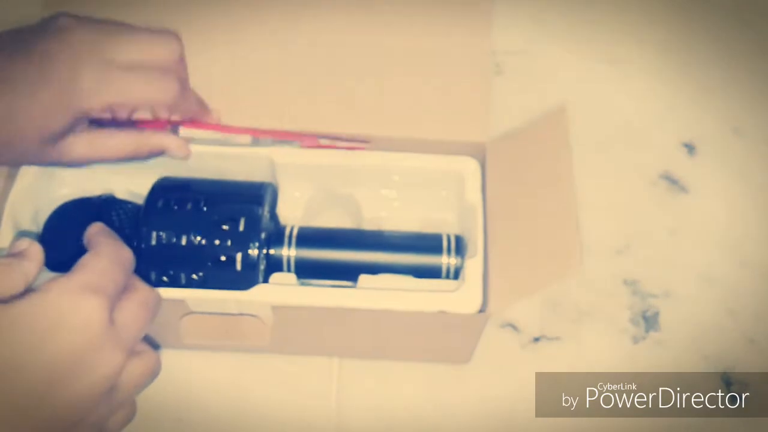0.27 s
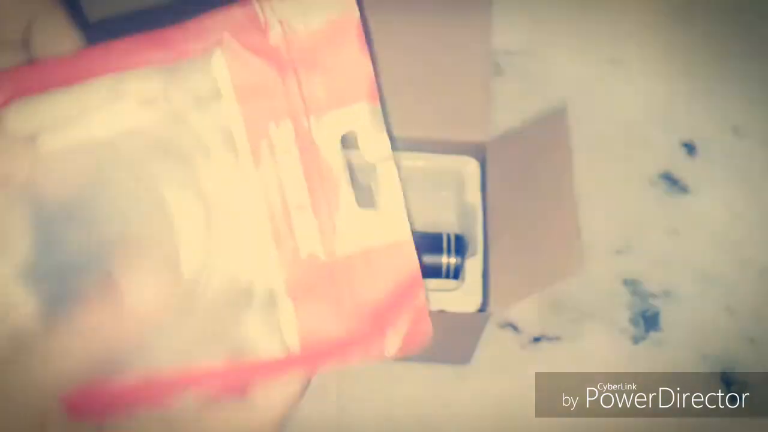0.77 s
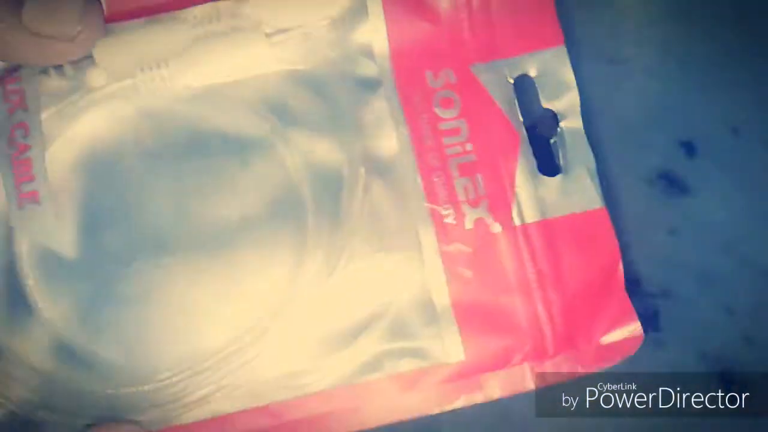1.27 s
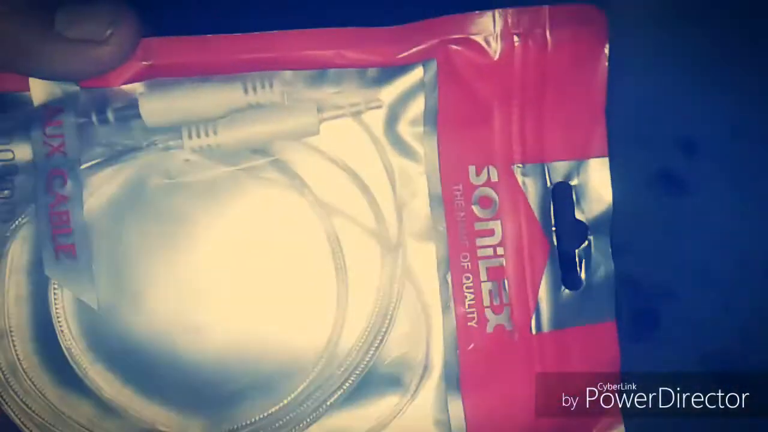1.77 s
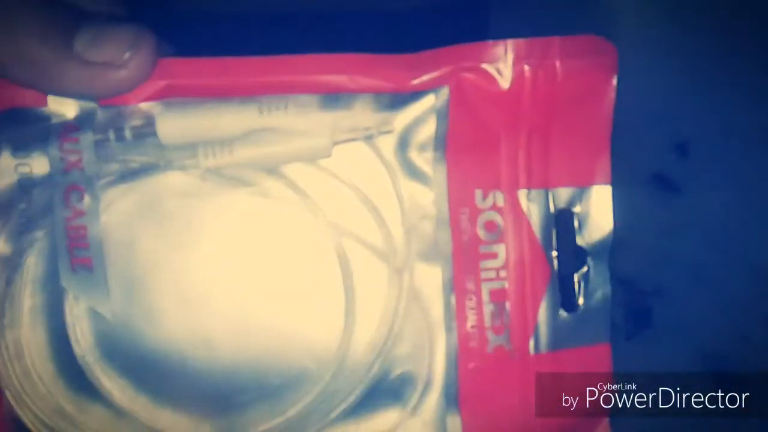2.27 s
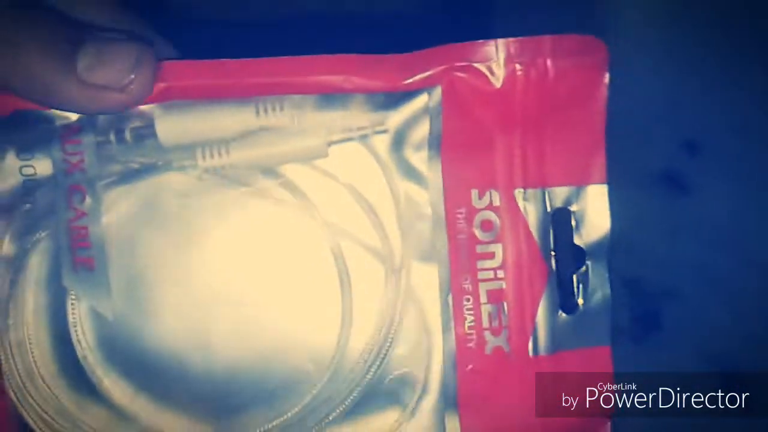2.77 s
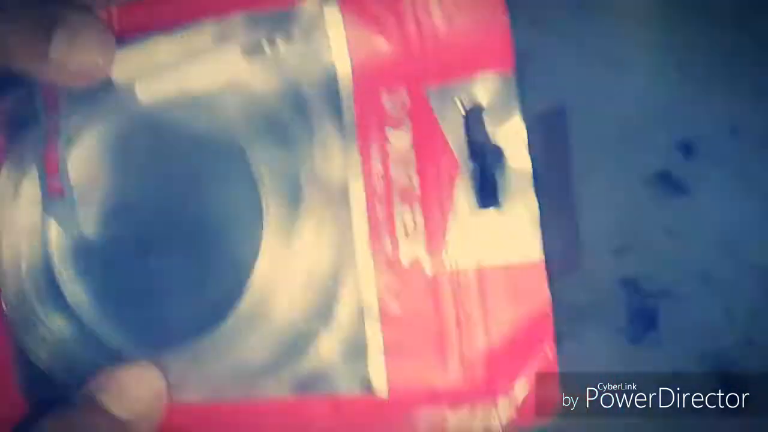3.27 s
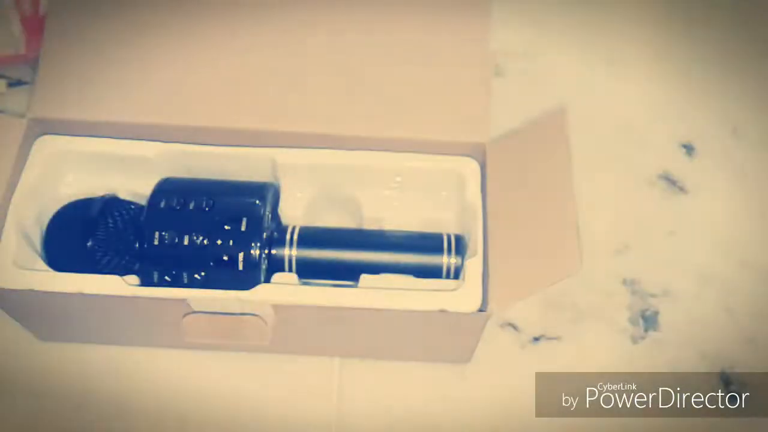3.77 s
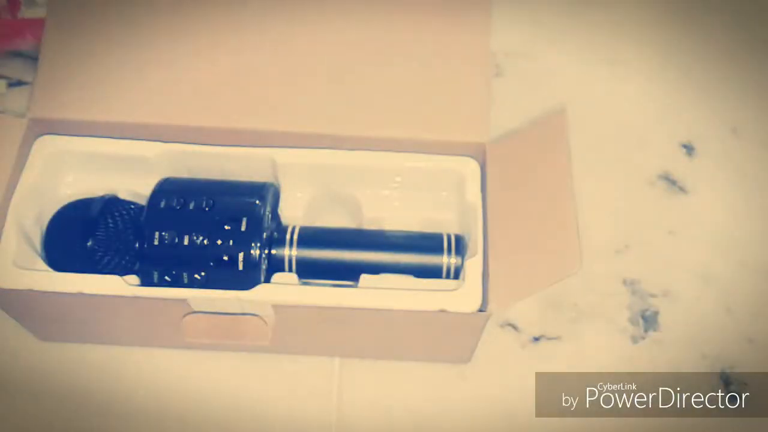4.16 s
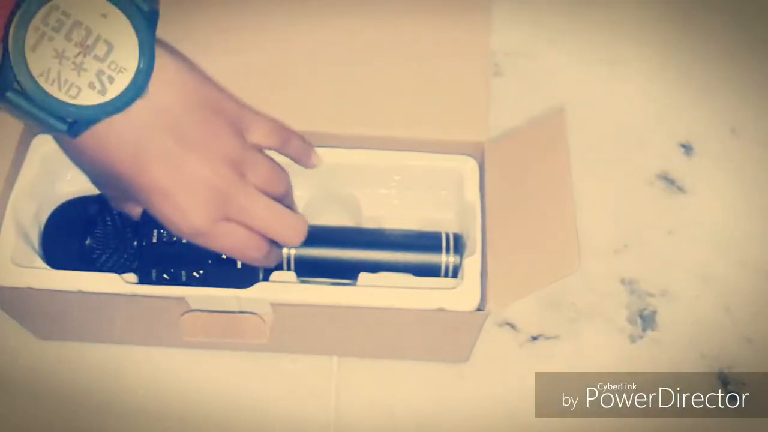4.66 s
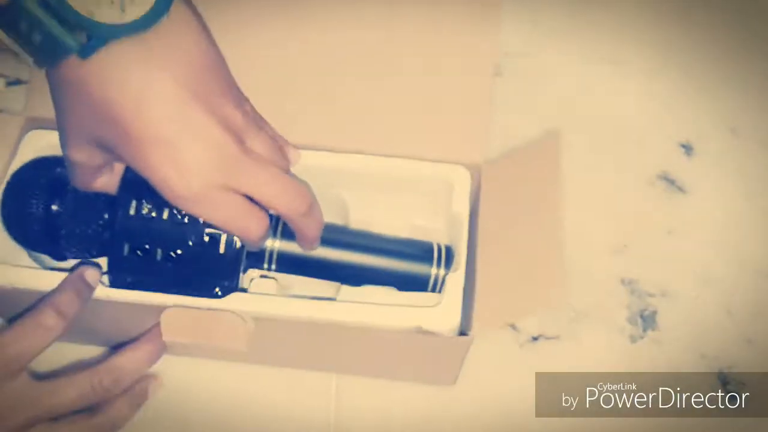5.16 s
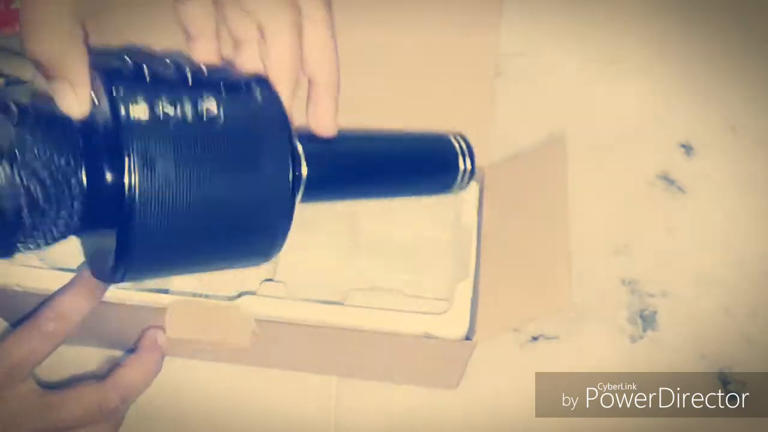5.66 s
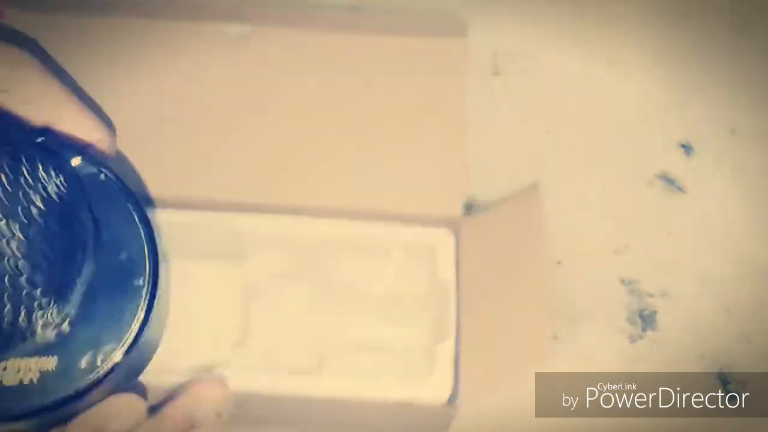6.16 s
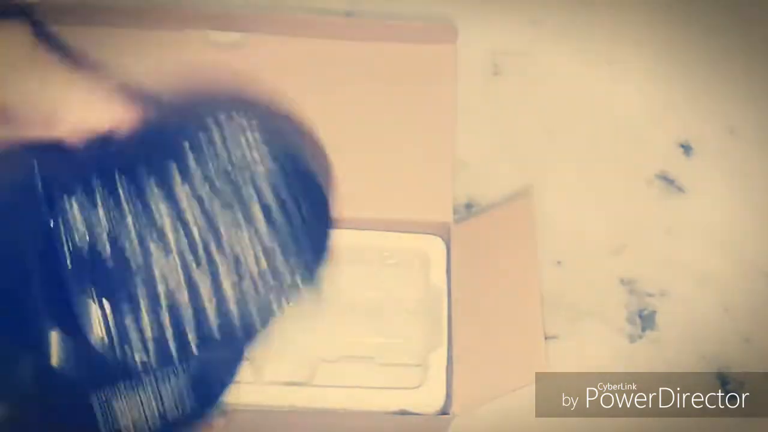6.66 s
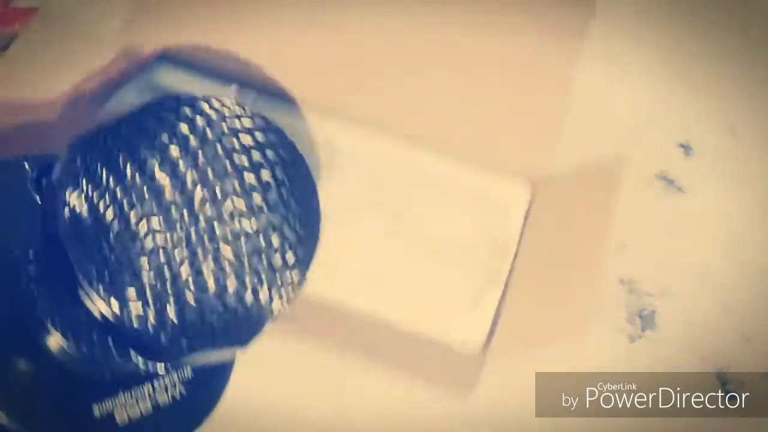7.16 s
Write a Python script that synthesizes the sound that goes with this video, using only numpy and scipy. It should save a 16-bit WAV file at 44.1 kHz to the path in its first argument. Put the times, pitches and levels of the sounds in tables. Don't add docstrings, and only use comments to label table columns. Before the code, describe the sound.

Close to one small microphone in a hard-walled room, a cardboard box is knocked on tiles and a foil-and-film pouch crinkles with sharp pops and ticks. The handling fades to faint touches over low room murmur and distant machine hum. Then a heavy object drags from a thin plastic tray whose ribs snap and flex, and the box drops back with hollow thuds, scraping and brushing skin.

```python
import sys
import numpy as np
from scipy import signal
from scipy.fft import rfft, irfft, next_fast_len
from scipy.io import wavfile
from scipy.ndimage import uniform_filter1d, map_coordinates

SR = 44100
rng = np.random.default_rng(int(sys.argv[2]) if len(sys.argv) > 2 else 0)


def master_out(mix):
    frames = np.transpose(np.atleast_2d(mix))
    ceiling = np.clip(frames, -1, 1)
    pcm = np.round(ceiling * 32767).astype(np.int16)
    wavfile.write(sys.argv[1], SR, pcm)


def nominal_scale(level):
    x = np.asarray(level, float) / 20
    return 10 ** x


N = 327513


def unit(x):
    return x / np.sqrt(np.mean(x ** 2) + 1e-20)


def along(points, hz):
    point_hz, value = np.transpose(points)
    return np.interp(np.log(hz + 1), np.log(point_hz + 1), value)


def wobble(rate_hz):
    at = np.arange(0, N + 16, 16)
    knots = rng.standard_normal(int(N * rate_hz / SR) + 4)
    return np.interp(np.arange(N), at, map_coordinates(knots, [at * rate_hz / SR]))


def filtered(x, response):
    m = next_fast_len(x.shape[-1] + 8192)
    return irfft(rfft(x, m) * response(np.fft.rfftfreq(m, 1 / SR)), m)[..., :x.shape[-1]]


def ring(t, hz, t60_s):
    return np.sin(2 * np.pi * hz * t) * nominal_scale(-60 * t / t60_s)


# frequency in Hz, level in dB per Hz.
RUB = [(35, -36), (60, -10), (96, 7), (133, -8.5), (172, -0.5), (527, -9), (830, -4.5), (1250, -8),
       (2050, -9.5), (2710, -11.5), (3850, -13.5), (5800, -16.5), (7060, -15.5), (7650, -26.5),
       (8710, -37.5), (14600, -25), (16000, -31.5)]


def band(lo_hz, hi_hz):
    def response(f):
        edges = (1 + (lo_hz / (f + 1)) ** 8) * (1 + (f / hi_hz) ** 8)
        return nominal_scale(along(RUB, f)) / np.sqrt(edges)
    return response


def slips(slow_db, fast_db, grit_db, patchy_db):
    clumps = nominal_scale(slow_db * wobble(25) + fast_db * wobble(220))
    struck = rng.random(N) < 0.015
    grains = struck * rng.standard_normal(N) * nominal_scale(5.2 * rng.exponential(size=N).clip(0, 2.3))
    rough = clumps * (rng.standard_normal(N) + nominal_scale(grit_db) * unit(grains))
    z = signal.stft(rough, nperseg=512)[2]
    field = uniform_filter1d(rng.standard_normal(z.shape), size=4, axis=0)
    field = uniform_filter1d(field, size=9, axis=1)
    return unit(signal.istft(z * nominal_scale(patchy_db * unit(field)), nperseg=512)[1][:N])


REST_DB = (-81.5, -73, -77, -94, -92.5)


def gestures(rows, rest_db, second=False):
    rounded = 1.3
    t = np.arange(0, N, 16) / SR
    power = nominal_scale(2 * rest_db)
    for s, rise, fall, db, *over_db in rows:
        away = np.where(t < s, (s - t) / rise, (t - s) / fall)
        power = power + nominal_scale(2 * (db + second * sum(over_db) - 20 * away ** rounded))
    return np.interp(np.arange(N) / SR, t, np.sqrt(power))


# start in seconds, peak in dB, panel in Hz, bright part in dB, low part in dB.
CREASES = [(0.0686, -42, 885, -28, -1), (0.0751, -32.5, 1180, -23.5, 5), (0.4691, -22.5, 4550, 0.5, -13),
           (0.7344, -34.5, 1270, -13, 0), (0.7441, -36, 4320, -28, -36), (0.9399, -35, 1090, -16, -27),
           (0.9529, -28.5, 2240, -27, -19), (1.0025, -34.5, 1340, -3.5, -23), (1.056, -41, 1180, -12, -12),
           (1.116, -57, 895, -38, 10), (1.1529, -32.5, 1970, -27, -6), (1.2406, -31.5, 1760, -16.5, -28),
           (1.3483, -28, 1250, -17, -8), (1.394, -56, 900, -36, 10), (1.4452, -41, 1800, -23, 4.5),
           (1.706, -32.5, 1760, -13, -36), (1.8564, -29, 1086, -23, -29.5), (2.141, -28, 1002, -28.5, -6),
           (3.325, -25, 1830, 0, -15), (3.3398, -44, 1810, -20, -18), (3.381, -32, 1080, -23, -20),
           (3.8208, -33, 1110, 0.5, -2.5)]
# start in seconds, peak in dB, panel in Hz, bright part in dB, low part in dB.
POPS = [(4.6253, -59, 970, -25, 4), (4.6513, -47.5, 920, -21, 19), (4.741, -53.5, 894, -24, 8),
        (4.7506, -52, 900, 1, 14.5), (5.0645, -46, 926, -39, 16), (5.1507, -33.5, 960, -25, -9),
        (5.2134, -29.5, 4300, 2.5, -26), (5.2395, -26.5, 1410, -22.5, -13.5),
        (5.3479, -23, 4570, -7.5, -31.5), (5.465, -22.5, 800, -9.5, -25), (5.544, -34, 1010, -5, -23.5),
        (6.152, -23.5, 880, -23, 10.5), (6.25, -24.5, 847, -18.5, -2), (6.9354, -43, 1440, -15.5, 4),
        (7.089, -46, 920, -25, 6), (7.1236, -36.5, 860, -25, -7)]
# start in seconds, peak in dB, air in dB.
TICKS = [(0.4024, -45, -14.5), (0.411, -40.5, -20.5), (0.422, -44.5, -20), (0.5716, -41, 0),
         (0.642, -50.5, -17.5), (0.6626, -38.5, -17.5), (0.829, -42.5, -22.5), (0.8576, -49, -18.5),
         (0.9161, -48.5, -16.5), (1.0234, -52, -21.5), (1.215, -49, -14), (1.282, -51, -19),
         (1.4665, -51.5, -35.5), (1.6183, -48, -14), (1.656, -55, -33), (3.9285, -50, -17),
         (3.946, -45.5, -10.5), (3.96, -51.5, -15), (3.978, -54.5, -1.5), (4.028, -51, -14.5),
         (4.0467, -44, -25), (4.2857, -53.5, -15), (4.871, -59, -25.5), (4.9363, -60, -10.5),
         (5.832, -53, -14.5), (6.6744, -58, -16.5), (6.6877, -58, -7.5), (6.74, -61, -24),
         (7.0362, -56, -22.5)]
# start in seconds, peak in dB.
FLECKS = [
    (0.1064, -73),
    (0.1111, -55.5),
    (0.1203, -53),
    (4.7102, -56.5),
    (5.5563, -40.5),
    (5.5951, -38.5),
]


def buckles():
    tick_hz, tick_bright_db, tick_low_db = 1340, -3, -14.5
    rows = [(s, db, hz, bright, -41.5, low) for s, db, hz, bright, low in CREASES]
    rows += [(s, db, hz, bright, -29.5, low) for s, db, hz, bright, low in POPS]
    rows += [(s, db, tick_hz, tick_bright_db, air, tick_low_db) for s, db, air in TICKS]
    flecks = [(s, db - 10.5, tick_hz, tick_bright_db, 0, tick_low_db) for s, db in FLECKS]
    return sorted(rows) + flecks


def snaps():
    out, t = np.zeros(N + SR), np.arange(SR // 25) / SR
    rows = buckles()
    chance = rng.standard_normal((len(rows), 4))
    puffs = rng.standard_normal((len(rows), 3, len(t)))

    def burst(i, lo_hz, hi_hz, t60_s):
        x = filtered(puffs[:, i], band(lo_hz, hi_hz)) * nominal_scale(-60 * t / t60_s)
        return x / abs(x).max(axis=1, keepdims=True)

    rasp = burst(0, 1004, 3600, 0.0095)
    crack = burst(1, 4500, 9500, 0.0085)
    air = burst(2, 9500, 16000, 0.024)
    rise = (1 - np.exp(-t / 0.00025)) ** 2
    for row, c, mid, hiss, top in zip(rows, chance, rasp, crack, air):
        s, db, hz, bright_db, air_db, low_db = row
        panel = ring(t, hz, 0.0089) + 0.54 * ring(t, 2600 + 200 * c[0], 0.0063) + 0.78 * mid
        bright = ring(t, 7150 + 90 * c[1], 0.0046) + 1.01 * hiss
        low = ring(t, 760 + 60 * c[2], 0.011)
        pop = panel + nominal_scale(bright_db + 2.0) * bright + nominal_scale(air_db + 8) * top + nominal_scale(low_db - 2.5) * low
        out[round((s + 0.0004) * SR):][:len(t)] += nominal_scale(db + 2.5) * rise * pop
    return out[:N]


# start in seconds, peak in dB, pitch in Hz.
NICKS = [(.1596, -52.5, 700), (.208, -42, 2300), (.246, -46, 4000), (.288, -31, 1500), (.318, -41, 4900),
         (.485, -41.5, 3000), (.573, -32, 5330), (.594, -41, 7300), (.614, -42, 4600), (.647, -41, 5500),
         (0.7453, -35, 3630), (.953, -24.5, 4150), (1.142, -55, 1500), (1.157, -45, 1090),
         (1.25, -41.5, 1000), (1.32, -49, 4470), (1.35, -30, 1750), (1.354, -35, 1100), (1.36, -46, 1480),
         (1.61, -62, 8000), (1.6823, -53, 4990), (3.055, -61.5, 4480), (4.61, -65.5, 6530),
         (4.634, -54.5, 3160), (4.663, -51, 3900), (4.671, -53, 6200), (4.672, -51, 3700),
         (4.702, -57, 4300), (4.752, -45, 4000), (4.84, -63, 4200), (4.865, -62.5, 6200),
         (4.889, -61, 6000), (4.928, -58, 6500), (4.938, -50.5, 3700), (5.101, -53.5, 900),
         (5.187, -39.5, 3370), (5.254, -31, 1600), (5.297, -37, 6600), (5.33, -36.5, 700),
         (5.42, -35.5, 1610), (5.458, -33, 6160), (5.504, -40.5, 1200), (5.545, -33.5, 2800),
         (5.574, -35.5, 900), (5.606, -40, 6910), (5.616, -43, 1300), (5.64, -40.5, 1000),
         (6.119, -63.5, 2200), (6.167, -24.5, 824), (6.269, -33, 1100), (6.252, -25, 780),
         (0.4694, -23, 6950), (3.3255, -27, 6840), (3.499, -57, 5000), (3.99, -47, 3970),
         (4.082, -58, 5560), (4.095, -58, 6500), (4.155, -56, 6060), (7.009, -61.5, 1200),
         (7.198, -45, 750)]
# start in seconds, peak in
# dB, pitch in Hz.
MORE_NICKS = [(.0678, -29, 620), (.0805, -31, 560), (.0755, -37, 3700), (.219, -36, 1400), (.2845, -33.5, 1412),
              (4.961, -47.5, 826), (4.987, -48, 980), (5.124, -43, 800), (5.17, -37, 930), (5.2445, -31.5, 1900),
              (5.262, -36.5, 1300), (5.396, -37.5, 840), (5.4675, -26.5, 793), (5.4655, -29, 2770),
              (6.1525, -24, 1990), (6.2505, -30.5, 2100), (6.291, -36.5, 361), (7.1185, -42, 2090),
              (7.1255, -33, 1040), (.7355, -33, 1300), (5.348, -31, 6960), (5.214, -30, 6500), (4.756, -46, 750),
              (1.157, -41, 2000), (1.2165, -50, 2500), (7.127, -36, 1500), (5.0655, -43, 1100), (.957, -37, 2200)]


def nicks(rows):
    cycles, fuzz = 16, 0.56
    out, t = np.zeros(N + SR), np.arange(SR // 30) / SR
    rise = 1 - np.exp(-t / 0.00073)
    for (s, db, hz), puff in zip(rows, rng.standard_normal((len(rows), len(t)))):
        rasp = unit(filtered(puff, lambda f: nominal_scale(along(RUB, f.clip(7060))) / (1 + (3.7 * (f - hz) / hz) ** 2)))
        fold = (np.sin(2 * np.pi * hz * t) + fuzz * rasp) * nominal_scale(-60 * t / (cycles / hz + 0.0039))
        out[round(s * SR):][:len(t)] += nominal_scale(db + 1.5) * rise * fold
    return out[:N]


# start in seconds, end in seconds, slips per second, level in dB, pitch in Hz.
CREAKS = [
    (1.277, 1.312, 165, -55, 3600),
    (1.277, 1.34, 150, -55, 7100),
    (5.425, 5.463, 230, -42, 6300),
    (.285, .335, 200, -41, 6600),
]


def creaks():
    rows = []
    for start, end, rate, db, hz in CREAKS:
        for s in np.arange(start, end, 1 / rate):
            late_s = 0.12 * rng.standard_normal() / rate
            slip_db = db + 2.5 * rng.standard_normal()
            rows.append((s + late_s, slip_db, hz * (1 + 0.05 * rng.standard_normal())))
    return rows


# peak, rise and fall in seconds, rustle in dB, hiss over rustle in dB.
CRUMPLES = [(.071, 0.0035, 0.025, -62, 13.5), (.12, 0.072, 0.84, -58, -6), (.214, 0.017, 0.07, -43, -6),
            (.299, 0.047, 0.093, -40.5, -0.5), (.475, 0.091, 0.17, -47.5, -4),
            (.58, 0.23, 0.21, -55.5, 5.5), (.746, 0.019, 0.021, -50, 7), (.842, 0.18, 0.089, -59.5, -1.5),
            (.958, 0.019, 0.033, -39.5, 0.5), (1.159, 0.066, 0.064, -68, 6.5), (1.3, 0.05, 0.05, -56, -2.5),
            (1.35, 0.054, 0.023, -51, -3.5), (1.6, 1, 0.93, -66, -35), (2.151, 0.02, 0.15, -74, -14),
            (3.2, 0.34, 0.96, -68, -5.5), (3.334, .012, 0.18, -59, -31), (3.75, 0.16, 0.14, -71.5, 2.5),
            (3.828, 0.013, 0.099, -56, 4.5), (4.041, 0.39, 0.22, -59.5, -7.5), (4.4, 0.71, 0.35, -70.5, -9)]
# peak, rise and fall in seconds, rustle in dB, hiss over rustle in dB.
FLEXES = [(4.663, 0.059, 0.086, -61.5, -22), (4.744, 0.018, 0.027, -64, 4), (5.0, 0.11, 0.3, -59.5, -2.5),
          (5.228, 0.14, 0.25, -44, -5), (5.461, .055, 0.019, -37, -9.5), (5.49, 0.43, 0.31, -47, -5.5),
          (5.61, 0.31, 0.12, -57, 6.5), (6.159, 0.0064, 0.063, -37.5, -14), (6.2, 0.026, 0.26, -47, -16),
          (6.316, 0.12, 0.11, -47, -9.5), (6.45, 0.15, 0.59, -66, -13), (6.944, 0.0077, 0.11, -68, -7),
          (7.1, 0.016, .4, -64, -6), (7.275, 0.19, 0.51, -45, -3.5)]
# peak, rise and fall in seconds, level in dB.
BRUSHES = [(.12, .05, 0.28, -79), (.2, 0.057, 0.029, -60), (.53, 0.093, 0.095, -47),
           (.635, 0.24, 0.024, -47), (.746, .05, 0.12, -68), (.968, 0.011, 0.0063, -47),
           (1.32, 0.095, 0.22, -64), (1.5, 0.22, 0.74, -81.5), (3.49, .2, 0.65, -84.5),
           (3.833, 0.017, 0.32, -71), (4.67, 0.053, 0.047, -69), (5.05, 0.34, .3, -75),
           (5.228, 0.12, 0.13, -53.5), (5.45, .2, 0.33, -67), (5.609, 0.11, 0.1, -57),
           (5.825, 0.3, 0.054, -71.5), (6.155, 0.0039, 0.048, -49), (6.22, 0.041, 0.18, -46.5),
           (6.32, 0.13, 0.053, -46), (7.1, 0.011, 0.34, -57), (7.28, 0.15, 0.57, -44.5)]


def film():
    drive = slips(slow_db=1.08, fast_db=1.32, grit_db=-6, patchy_db=2.5)
    bends = CRUMPLES + FLEXES
    rustle = gestures(bends, REST_DB[2]) * unit(filtered(drive, band(1800, 3150)))
    hiss = gestures(bends, REST_DB[3], second=True) * unit(filtered(drive, band(4000, 12500)))
    air = gestures(BRUSHES, REST_DB[4]) * unit(filtered(drive, band(9000, 13600)))
    return nominal_scale(-6.0) * (rustle + hiss + air)


# peak, rise and fall in seconds, body in dB, walls over body in dB.
SHOVES = [(.076, 0.0065, 0.046, -32, -5), (.13, 0.041, 0.5, -51.5, -2), (.3, 0.2, 0.16, -52, 13.5),
          (.58, 0.35, 0.25, -52.5, 4.5), (.75, 0.018, 0.026, -49.5, 5), (.97, 0.03, 0.032, -42, 3),
          (1.141, 0.028, 0.094, -65, -6), (1.35, 0.16, 0.09, -52.5, -1.5), (3.354, 0.34, 0.4, -63, -20.5),
          (3.83, 0.012, 0.099, -48.5, 0.5), (3.95, 0.073, 0.54, -60.5, 0.5)]
# peak, rise and fall in seconds, body in dB,
# walls over body in dB.
DRAGS = [(4.66, 0.02, 0.3, -56.5, -2), (4.965, 0.06, 0.25, -56, 7), (5.152, 0.06, 0.15, -48, 4),
         (5.256, .15, 0.054, -47.5, 13.5), (5.4, 0.55, 0.42, -47.5, 7.5), (5.469, 0.049, 0.02, -38.5, 9),
         (5.6, 0.24, 0.31, -51.5, 8), (6.168, 0.015, 0.21, -33.5, -0.5), (6.939, 0.007, 0.056, -47, -6),
         (7.127, 0.016, 0.24, -42.5, -4), (7.32, 0.37, 0.2, -58, 10.5), (7.06, 0.056, 0.1, -53.5, -26)]


def box():
    drive = slips(slow_db=2.0, fast_db=2.0, grit_db=-13.5, patchy_db=0.5)
    body = gestures(SHOVES + DRAGS, REST_DB[0]) * unit(filtered(drive, band(135, 510)))
    walls = gestures(SHOVES, REST_DB[1], second=True) * unit(filtered(drive, band(450, 1650)))
    tray = gestures(DRAGS, REST_DB[3], second=True) * unit(filtered(drive, band(480, 1300)))
    return nominal_scale(-1.5) * body + nominal_scale(-7.0) * walls + nominal_scale(-9.5) * tray


# start in seconds, peak in dB, body in Hz, walls in dB, t60 in seconds.
KNOCKS = [(0.0666, -25.5, 282, 2, 0.066), (0.468, -40, 342, 7.5, 0.06), (0.529, -38, 473, 3, 0.044),
          (0.658, -30, 380, -9, 0.019), (0.824, -49, 404, 5.5, 0.08), (0.936, -30, 287, 4, 0.024),
          (0.968, -25.5, 458, -25, 0.017), (0.978, -27, 298, -12, 0.011), (1.241, -42, 430, 7, 0.027),
          (1.349, -33.5, 250, 3, 0.044), (3.264, -39.5, 216, -0.5, 0.03), (3.818, -31, 510, -30, 0.031),
          (4.649, -57, 408, 15.5, 0.1), (5.263, -31.5, 178, -15, 0.065), (5.463, -34.5, 378, 1.5, 0.069),
          (6.151, -28, 205, 6.5, 0.12), (6.248, -29, 432, 5, 0.045), (6.933, -39.5, 181, -7.5, 0.15),
          (7.122, -30.5, 325, 3.5, 0.044), (7.119, -30, 193, -8, 0.093), (3.323, -38.5, 310, -12, 0.022),
          (3.378, -38.5, 450, -2, 0.022), (6.164, -31, 291, 3.5, 0.1), (6.183, -33.5, 445, 3, .09),
          (6.219, -36, 444, -4, 0.039), (0.0731, -36, 207, 13, .04)]
# frequency in Hz, level in dB.
WALLS = [(430, 4.5), (640, -2), (810, 8), (1100, 3), (1450, -2.5)]


def knocks():
    out, t = np.zeros(N + SR), np.arange(SR // 3) / SR
    rise = 1 - np.exp(-t / 0.0019)
    chance = rng.standard_normal((len(KNOCKS), 2, len(WALLS)))
    for (s, db, hz, wall_db, t60), (size, pitch) in zip(KNOCKS, chance):
        walls = 0
        for (f, level), g, p in zip(WALLS, size, pitch):
            walls = walls + nominal_scale(level + 2.5 * g) * ring(t, f * (1 + 0.098 * p), 0.64 * t60)
        body = ring(t, hz, t60) + 0.5 * ring(t, 1.2 * hz, 0.6 * t60)
        blow = body + nominal_scale(wall_db - 10.0) * walls
        out[round((s + 0.002) * SR):][:len(t)] += nominal_scale(db + 2) * rise * blow
    return out[:N]


# start in seconds, end in seconds, centre in Hz, width in Hz,
# level in dB.
SLIDES = [(0.265, 0.365, 1430, 220, -44.5), (.203, 0.284, 3900, 700, -53.5), (.195, .27, 920, 610, -47),
          (4.728, 4.785, 4000, 960, -60.5), (5.165, 5.2, 850, 350, -48), (3.685, 3.73, 6600, 900, -70),
          (4.13, 4.165, 6600, 1300, -66), (4.03, 4.06, 7000, 1200, -68), (5.552, 5.72, 860, 430, -49.5),
          (5.73, 5.865, 4300, 1300, -64), (6.682, 6.894, 2300, 1100, -73.5), (.345, 0.42, 1420, 260, -52),
          (0.21, 0.28, 2300, 560, -53), (.28, .35, 4500, 900, -53), (6.27, 6.52, 760, 170, -58),
          (7.27, 7.33, 1130, 400, -50), (5.31, 5.4, 690, 360, -50)]


def slides():
    out, t = np.zeros(N), np.arange(N) / SR
    for start, end, hz, width, db in SLIDES:
        stroke = np.clip((t - start) / 0.012, 0, 1) * np.clip((end - t) / 0.052, 0, 1)
        hiss = filtered(rng.standard_normal(N), lambda f: 1 / (1 + (2 * (f - hz) / width) ** 2))
        out += nominal_scale(db + 1.9 * wobble(29)) * stroke * unit(hiss)
    return out


# start in seconds, peak in dB, pitch in Hz.
BUMPS = [
    (0.33, -52, 69),
    (0.383, -42.5, 71),
    (0.509, -48, 72.6),
    (0.741, -42.5, 97),
    (5.141, -46.5, 98.3),
]


def bumps():
    out, t = np.zeros(N + SR), np.arange(SR // 8) / SR
    for s, db, hz in BUMPS:
        out[round(s * SR):][:len(t)] += nominal_scale(db + 5.5) * (1 - np.exp(-t / 0.0019)) * ring(t, hz, 0.1)
    return out[:N]


# frequency in Hz, t60 in seconds.
ROOM = [(150, 0.53), (700, 1), (2500, 0.6), (7000, 0.62), (14000, 1)]


def room(x):
    out, step = np.zeros(N + 2 * SR), SR // 3
    for at in range(0, N, step):
        hz, t, z = signal.stft(rng.standard_normal(SR), SR, nperseg=256)
        decay = nominal_scale(-60 * t / along(ROOM, hz)[:, None])
        tail = signal.istft(z * decay, SR, nperseg=256)[1]
        wet = signal.fftconvolve(x[at:at + step], tail / np.linalg.norm(tail))
        out[at + 300:][:len(wet)] += wet
    return out[:N]


# start in seconds, end in seconds, pitch in Hz, level in dB rms.
HUMS = [
    (1.1, 1.72, 143, -62.5),
    (1.84, 2.4, 124.3, -68),
    (2.279, 2.8, 130.6, -73.5),
    (2.45, 3.2, 84.4, -73),
    (2.98, 3.3, 167, -71),
    (3.48, 3.72, 133.5, -66),
    (4.4, 4.8, 106, -67),
    (1.4, 4.8, 301, -87),
]


def hums():
    out, t = np.zeros(N), np.arange(N) / SR
    for start, end, hz, db in HUMS:
        fade = np.clip(np.minimum(t - start, end - t) / 0.13, 0, 1)
        level = nominal_scale(db - 1.0 + 2.6 * wobble(9))
        out += level * fade * np.sin(2 * np.pi * hz * t + 1.1 * wobble(8))
    return out


# frequency in Hz, level in dB per Hz.
HUSH = [(13, -50), (22, -7), (43, -22.5), (64, -6), (128, -5.5), (160, -5), (217, -10.5), (347, -14.5),
        (653, -21), (730, -38), (1170, -24.5), (1300, -30.5), (7390, -51.5), (14700, -40), (16000, -51.5)]
# pitch in Hz, level in dB rms.
WHINE = (1200, -81.5)


def hush():
    murmur = unit(filtered(rng.standard_normal(N), lambda f: nominal_scale(along(HUSH, f))))
    rumble = nominal_scale(-65.5 + 0.37 * wobble(18.0)) * murmur
    motor = unit(filtered(rng.standard_normal(N), lambda f: 1 / (1 + ((f - 138) / 12) ** 2)))
    drone = nominal_scale(-79 + 0.56 * wobble(1.5)) * motor
    whine_hz, whine_db = WHINE
    tone = np.sin(2 * np.pi * whine_hz * np.arange(N) / SR)
    return rumble + drone + nominal_scale(whine_db + 3.5 + 1.1 * wobble(5.5)) * tone


def scene():
    pops = snaps() + nicks(NICKS) + nicks(MORE_NICKS) + nicks(creaks())
    blows = knocks()
    rubbing = box() + film() + slides() + bumps() + hush() + hums()
    mono = rubbing + pops + blows + room(nominal_scale(-16.0) * pops + nominal_scale(-12.0) * blows)
    return np.array([mono, mono])


def roll_off(x):
    return signal.sosfilt(signal.butter(12, 16660, fs=SR, output="sos"), x)


# frequency in Hz, level in dB per Hz.
APART = [(18, -45.5), (30, -14), (64, -15.5), (102, -4), (432, -2), (532, -6), (639, -1.5), (4420, -20),
         (15500, -25)]


def record(dry):
    hiss_db, mute_db, top_hz = -78.5, -46, 15750
    loudness = np.sqrt(abs(uniform_filter1d(dry[0] ** 2, size=2048)))
    hiss = unit(filtered(rng.standard_normal(N), lambda hz: nominal_scale(along(APART, hz))))
    trace = nominal_scale(hiss_db) * hiss / (1 + (loudness / nominal_scale(mute_db)) ** 6)

    def microphone(hz):
        top = np.where(hz < top_hz, 1, nominal_scale(-25) * (hz < 16500))
        return top * hz ** 2 / (hz ** 2 + 28 ** 2)

    return roll_off(filtered(dry + [trace, -trace], microphone))


dry = scene()
out = record(dry)
master_out(out)
```